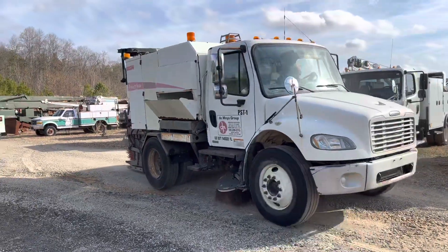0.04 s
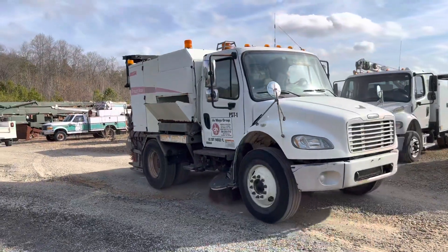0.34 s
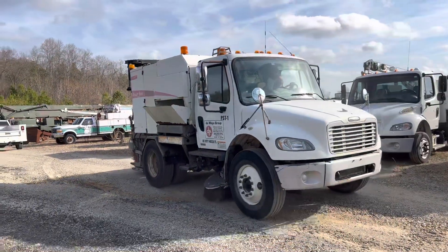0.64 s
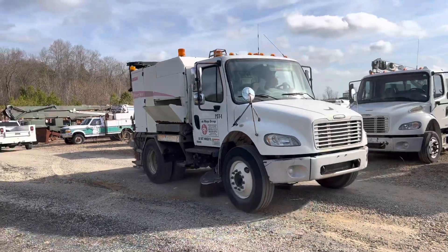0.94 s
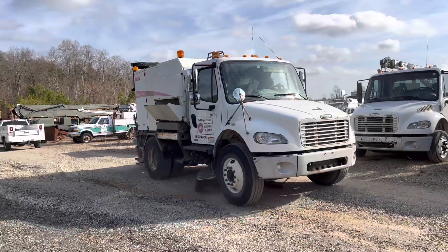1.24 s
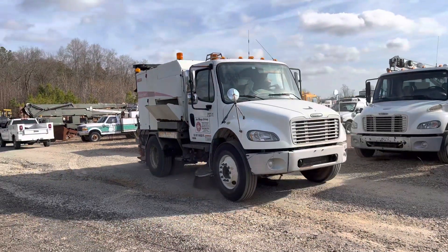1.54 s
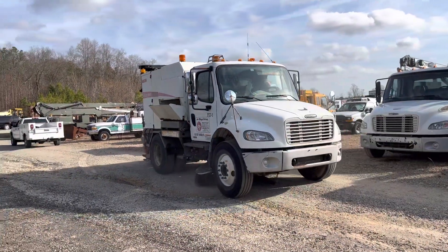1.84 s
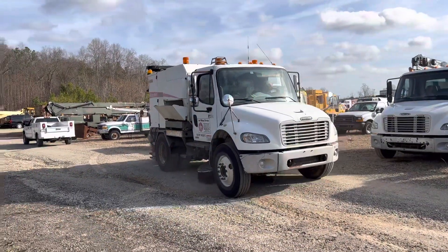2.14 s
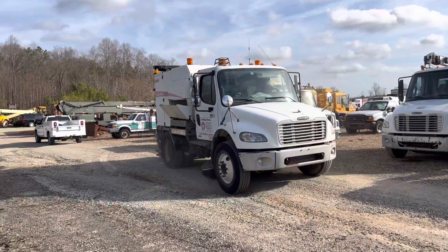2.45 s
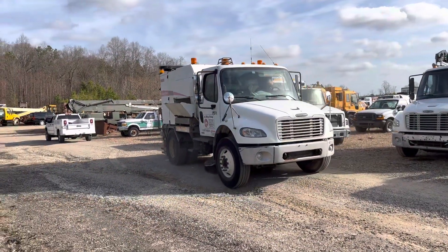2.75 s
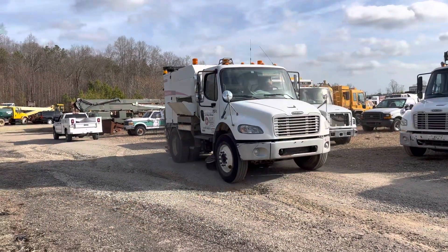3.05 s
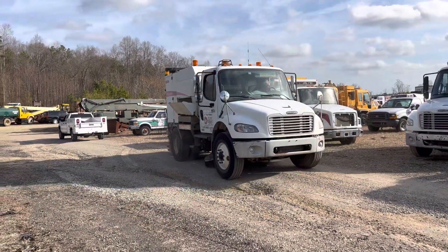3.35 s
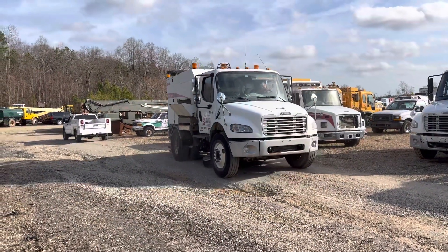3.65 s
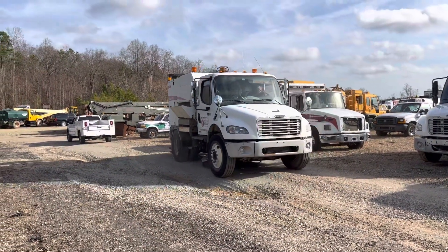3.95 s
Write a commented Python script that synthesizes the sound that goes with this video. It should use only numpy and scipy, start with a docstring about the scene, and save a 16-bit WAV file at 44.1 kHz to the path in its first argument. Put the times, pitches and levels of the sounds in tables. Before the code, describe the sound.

A diesel truck engine rumbles and clatters nearby outdoors, with a bright air hiss. The hiss drops as a faint whine begins; the engine slows, growls and moves further off, then the hiss returns among sharp knocks.

```python
"""A diesel sweeper truck backs slowly away across an open gravel lot, its engine just above idle. From the
start the exhaust throbs and rumbles, burning fuel knocks the engine and rattles panels, and air hisses. After a
second the hiss sinks, the gears begin to whine, and a faint, short, high tick sounds; then the exhaust thumps
once. Around two seconds the engine slows and growls under load, and its knock sounds further off. Toward the
end the hiss swells again and ten hard knocks stand out of the clatter."""
import sys
import numpy as np
from scipy import signal
from scipy.fft import rfft, irfft
from scipy.io import wavfile

SR = 44100
rng = np.random.default_rng(int(sys.argv[2]) if len(sys.argv) > 2 else 0)


def to_wav(s):
    """Save 16-bit WAV."""
    ch = np.atleast_2d(s).T  # columns
    pcm = np.round(np.clip(ch, -1, 1) * 32767)  # PCM
    wavfile.write(sys.argv[1], SR, pcm.astype(np.int16))


N = 176400

# how much louder the left side is than the right: f/Hz, difference/dB
LEFT_OVER_RIGHT = [(45, -6), (150, 1.5), (380, 2.5), (600, -6), (970, 1), (1250, -5), (1900, -2.5),
                   (2800, -2.5), (4000, 0.5), (5500, 5), (7000, 3.5), (8400, -2), (10000, 0)]


def from_db(db):
    """Turn decibels into a number to multiply by."""
    return 10 ** (np.asarray(db) / 20)


def unit_power(x):
    """Scale a signal so that its average power is 1."""
    return x / np.sqrt(np.mean(x ** 2) + 1e-20)


def in_time(rows):
    """Join a table's rows with straight lines over time: one curve for each column after the first."""
    times, *columns = np.transpose(rows)
    return [np.interp(np.arange(N) / SR, times, column) for column in columns]


def frequencies():
    """The frequency in Hz of each point of a spectrum, never below 1."""
    return np.maximum(np.arange(N // 2 + 1) * SR / N, 1)


def over_hz(points):
    """Join a table's rows with straight lines, giving every octave the same room."""
    hz, value = np.transpose(points)
    return np.interp(np.log(frequencies()), np.log(hz), value)


def drift(hz):
    """A smooth random wobble of about size 1, mostly slower than hz."""
    return unit_power(irfft(rfft(rng.standard_normal(N)) / (1 + (frequencies() / hz) ** 2), N))


def resonance(hz, width_hz):
    """The filter of a part that rings: it lets through mostly what lies near hz."""
    return 1 / (1 + 1j * (frequencies() - hz) / width_hz) ** 2


def radiate(noise_pair, tone_filter):
    """Filter two noises and blend them into one stereo sound of power 1."""
    # stereo width, what differs between the ears against what they share: f/Hz, level/dB
    stereo_width = [(60, -28), (150, -18), (330, -10), (510, -4), (760, -10), (1130, 0), (1350, -5),
                    (2400, -4.5), (3300, 0), (4300, -3), (5400, 1.3), (8600, 0)]
    width = from_db(over_hz(stereo_width))
    direct_share, sign = 0.14, np.array([[1], [-1]])  # sign: left, right
    middle, scattered = rfft(noise_pair) * tone_filter
    # the direct sound reaches the right ear first
    side = np.sqrt(1 - direct_share) * scattered - 1j * np.sqrt(direct_share) * middle
    both = (middle + sign * width * side) / np.sqrt(1 + width ** 2)
    return unit_power(irfft(both * from_db(sign * over_hz(LEFT_OVER_RIGHT) / 2), N))


def cycle_noise(firings, repeat_share):
    """Two noises that partly repeat each time all six cylinders have fired."""
    size = 6000
    place = (firings / 6 % 1 * size).astype(int) % size
    repeating = rng.standard_normal((2, size))[:, place]
    return np.sqrt(repeat_share) * repeating + np.sqrt(1 - repeat_share) * rng.standard_normal((2, N))


def blows(firings, rate, decay_s, spread_db):
    """A loudness curve that jumps to a random height once per firing and dies away."""
    count = firings + 0.25  # blows land a quarter of a firing early
    strength = from_db(spread_db * np.minimum(rng.standard_normal(size=400), 1.5))
    return strength[count.astype(int)] * np.exp(-(count % 1) / rate / decay_s)


def bumps():
    """A faint, short, high tick sounds, and the exhaust thumps once."""
    # the tick and the thud: t/s, level/dB, f/Hz, width/Hz, decay/s
    hits = [(1.07, -41, 7000, 5000, .002), (1.517, -27, 85, 25, .011)]
    out = 0
    for start, db, hz, width_hz, decay_s in hits:
        age = np.maximum(np.arange(N) / SR - start, 0) / decay_s
        noise = radiate(rng.standard_normal((2, N)), resonance(hz, width_hz))
        out = out + from_db(db) * age * np.exp(1 - age) * noise
    return out


def rattles(firings, rate):
    """Every firing shakes a loose metal part and a thin panel, each ringing at its own pitch."""
    # loudness of the loose part: t/s, level/dB
    part_level = [(0, -44.5), (.88, -39), (1.05, -45.5), (1.76, -43.5), (1.84, -40), (1.92, -47.5),
                  (2.5, -42.5), (2.7, -50), (2.95, -40), (3.45, -55), (3.55, -45), (3.65, -46)]
    # loudness of the panel: t/s, level/dB
    panel_level = [(0, -55), (1, -49.5), (1.8, -48), (2.3, -57)]
    out = 0
    for level, hz, width_hz in [(part_level, 4360, 225), (panel_level, 3055, 70)]:
        taps = rng.standard_normal((2, N)) * blows(firings, rate, decay_s=.04, spread_db=1.7)
        out = out + from_db(in_time(level)[0]) * radiate(taps, resonance(hz, width_hz))
    return out


def whine(hz, db, width_hz):
    """The rough tone of a spinning part: a narrow band of noise that follows hz."""
    turning = np.exp(2j * np.pi * np.cumsum(hz) / SR)
    pair = [np.real(turning * (drift(width_hz) + 1j * drift(width_hz))) for _ in range(2)]
    return from_db(db) * radiate(np.array(pair), 1)


def gears(rate):
    """The timing gears whine, and the drive for the engine's accessories sings in step with its speed."""
    # whine of the timing gears: t/s, f/Hz, level/dB
    gear_tone = [(0, 1385, -74), (1.0, 1340, -38.5), (1.6, 1386, -34), (2.1, 1365, -34.5), (2.3, 1330, -42),
                 (4, 1338, -34)]
    # tones of the drive: multiple of the firing rate, relative level/dB
    drive_tones = [(16.68, 0), (19.3, -3), (21.6, -3)]
    # loudness of the drive: t/s, level/dB
    drive_level = [(0, -39), (.5, -36), (.95, -42), (4, -40)]
    drive_db, = in_time(drive_level)
    drive = sum(whine(multiple * rate, drive_db + db, width_hz=16) for multiple, db in drive_tones)
    return drive + whine(*in_time(gear_tone), width_hz=49)


def rushing_air(level, colour):
    """Fluttering noise from a small leak: most comes straight to the ears, the rest is scattered."""
    direct_share, left_lag_s, sign = 0.68, .00026, np.array([[1], [-1]])
    flutter_db = 1.05 * drift(24) + 0.6 * drift(300)
    leak, *scattered = rfft(rng.standard_normal((3, N)) * from_db(flutter_db))
    direct = leak * np.exp(-1j * np.pi * sign * frequencies() * left_lag_s)
    air = np.sqrt(direct_share) * direct + np.sqrt(1 - direct_share) * np.array(scattered)
    tone_filter = from_db(over_hz(colour) + sign * over_hz(LEFT_OVER_RIGHT) / 2)
    return from_db(in_time(level)[0]) * unit_power(irfft(air * tone_filter, N))


def hiss():
    """Leaking air: a bright hiss swells and sinks, and a lower one from the truck's side fades."""
    # loudness of the bright hiss: t/s, level/dB
    bright_level = [(0, -32.5), (.2, -32), (.33, -33.5), (.95, -36.5), (1.06, -50), (1.4, -53),
                    (1.8, -41.5), (2.22, -46.5), (2.6, -38), (2.8, -36), (3.1, -42), (3.2, -37),
                    (3.7, -40.5)]
    # its tone colour: f/Hz, relative level/dB
    bright_colour = [(1500, -19), (3300, -3), (5300, 5), (7000, 0), (8800, 6.5), (10500, -5), (16000, -4.5)]
    # loudness of the lower hiss: t/s, level/dB
    side_level = [(0, -36), (.88, -37.5), (1.05, -43), (4, -57)]
    # its tone colour: f/Hz, relative level/dB
    side_colour = [(1500, -10.5), (2800, 14.5), (4400, -7.5), (6300, 11.5), (9000, -60), (16000, -26)]
    return rushing_air(bright_level, bright_colour) + rushing_air(side_level, side_colour)


def growl(firings):
    """Wavering low tones and the ringing body swell as the engine takes up load."""
    # loudness of the growl: t/s, level/dB
    level = [(0, -67), (1.3, -39.5), (1.75, -34.5), (2.2, -31.5), (2.5, -36), (2.8, -36), (3.2, -39.5),
             (4, -36.5)]
    # its tones: multiple of the firing rate, relative level/dB
    tones = [(3, -8), (4, -5.5), (4.65, -3.5)]
    out = from_db(-7) * radiate(cycle_noise(firings, repeat_share=0.26), resonance(hz=196, width_hz=71))
    for multiple, db in tones:
        tone = np.sin(2 * np.pi * multiple * firings + 1.1 * drift(1.6))  # the pitch wanders a little
        out = out + from_db(db) * unit_power(tone * from_db(3.5 * drift(3.3)))
    return from_db(in_time(level)[0]) * out


def rumble(firings):
    """Puffs of exhaust gas shake the pipe and the body."""
    # tone colour of the rumble: f/Hz, relative level/dB
    colour = [(30, -42), (60, 2), (85, 7), (115, -4), (150, 3), (195, 0), (255, -1), (300, 1), (400, -4.5),
              (490, -9), (1000, -39)]
    # its loudness: t/s, level/dB
    level = [(0, -29.5), (1.1, -31)]
    puffs = cycle_noise(firings, repeat_share=0.42) * (1 + 0.093 * np.cos(2 * np.pi * firings))
    return from_db(in_time(level)[0]) * radiate(puffs, from_db(over_hz(colour)))


def hard_knocks():
    """Now and then a firing hits hard: a noisy crack, and one part of the engine rings."""
    # knocks that stand out: t/s, level/dB, ringing f/Hz
    hits = [(2.689, -28, 1620), (2.803, -30, 1330), (2.935, -32, 2200), (3.01, -29.5, 1363),
            (3.087, -36, 2200), (3.221, -28.5, 1335), (3.452, -29, 1690), (3.519, -30, 1546),
            (3.589, -33, 1320), (3.724, -27, 1730)]
    rise_s, decay_s = .002, .017
    crack = from_db(-6) * radiate(rng.standard_normal((2, N)), resonance(hz=1790, width_hz=540))
    out = 0
    for start, db, hz in hits:
        age = np.maximum(np.arange(N) / SR - start, 0)
        loudness = (1 - np.exp(-age / rise_s)) * np.exp(-np.minimum(age, 1) / decay_s)
        out = out + from_db(db) * loudness * (crack + np.sqrt(2) * np.sin(2 * np.pi * hz * age))
    return out


def knock(firings, rate):
    """Burning fuel and chattering valves make the engine ring; the tone shifts as the truck leaves."""
    # tone colour beside the cab: f/Hz, relative level/dB
    near_colour = [(300, -16.5), (500, -16), (640, -4), (780, -3.5), (1020, -3), (1180, -4.5), (1400, -3.5),
                   (1750, -5), (2050, -5.5), (2350, -10.5), (2800, -12.5), (3500, -17), (5000, -22),
                   (9000, -39.5), (16000, -51)]
    # tone colour from further off, in front: f/Hz, relative level/dB
    far_colour = [(300, -41), (500, -14), (670, -0.5), (930, -1.5), (1110, -8.5), (1320, -3), (1480, -7),
                  (1650, -4.5), (1830, -3.5), (2000, -8.5), (2230, -5), (2480, -6.5), (2720, -12),
                  (3600, -16), (5000, -23), (9000, -21.5), (16000, -101)]
    # the truck draws away: t/s, level/dB, share of the far colour (0 to 1)
    backing_away = [(0, -25.5, 0), (.5, -26, 0.14), (1.05, -27, 0.23), (1.8, -27.5, 0.3),
                    (2.4, -28.5, 0.93)]
    # ringing parts of the engine: f/Hz, width/Hz, relative level/dB
    ringing_parts = [(934.5, 52, -15.5), (1303, 43, -21.5), (1670, 50, -15), (2257, 50, -13),
                     (2458, 47, -15.5)]
    level_db, far_share = in_time(backing_away)
    repeat_share = 0.55
    force = 2.5 + 0.54 * blows(firings, rate, decay_s=0.0049, spread_db=10)
    chatter = cycle_noise(firings, repeat_share) * force
    near = radiate(chatter, from_db(over_hz(near_colour)))
    far = radiate(chatter, from_db(over_hz(far_colour)))
    out = (1 - far_share) * near + far_share * far
    for hz, width_hz, db in ringing_parts:
        strikes = cycle_noise(firings, repeat_share) * blows(firings, rate, decay_s=0.014, spread_db=5.5)
        out = out + from_db(db) * radiate(strikes, resonance(hz, width_hz))
    return from_db(level_db) * out


def exhaust(firings, rate):
    """One throb per firing makes a deep, clean note, with wavering higher tones above it."""
    # tones of the exhaust: multiple of the firing rate, relative level/dB
    tones = [(1, 0), (2, -16), (3, -26.5), (4, -23), (5, -32)]
    # loudness of the exhaust: t/s, level/dB
    level = [(0, -20), (.35, -19.5), (1.05, -23), (1.55, -22), (1.9, -24), (2.12, -27), (2.8, -26),
             (4, -23.5)]
    left, left_lag_s, left_boost_db = np.array([[1], [0]]), 0.00012, 0.6
    firings_at_ears = firings - left * left_lag_s * rate
    note = 0
    for multiple, db in tones:
        waver_db = 0.4 * drift(15) if multiple == 1 else 3 * drift(5.9)
        note = note + from_db(db + waver_db) * np.sin(2 * np.pi * multiple * firings_at_ears)
    return np.sqrt(2) * note * from_db(in_time(level)[0] + left * left_boost_db)


def scene():
    """The engine's speed sets the beat of exhaust, rumble and knock; gears, rattles and air join in."""
    # how often fuel fires in the six-cylinder engine: t/s, firing rate/Hz
    engine_speed = [(0, 46.4), (.3, 47.3), (.7, 46.7), (1.1, 45.65), (1.5, 45.1), (1.9, 44.25), (2.1, 42.2),
                    (2.5, 42.65), (2.9, 42.5), (3.3, 43.7), (3.7, 44.2), (4, 44.1)]
    rate, = in_time(engine_speed)
    firings = np.cumsum(rate * (1 + .002 * drift(10))) / SR  # firings so far, at a slightly uneven pace
    engine = exhaust(firings, rate) + growl(firings) + rumble(firings) + knock(firings, rate)
    return engine + hard_knocks() + rattles(firings, rate) + gears(rate) + hiss() + bumps()


def record(dry):
    """Cut away the very highest treble with a steep filter."""
    cutoff_hz = 15900
    return signal.sosfilt(signal.ellip(12, .1, 90, cutoff_hz, fs=SR, output="sos"), dry)


dry = scene()
out = record(dry)
to_wav(out)
```